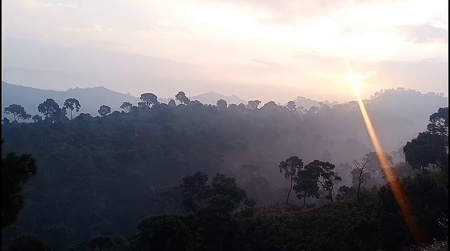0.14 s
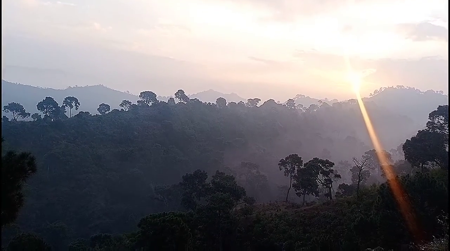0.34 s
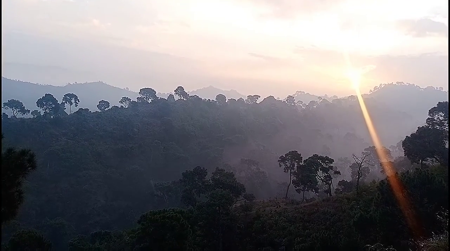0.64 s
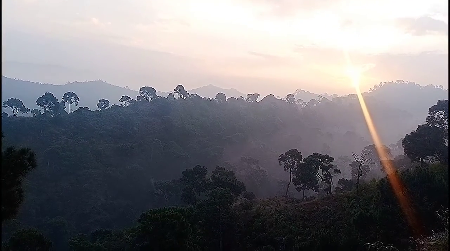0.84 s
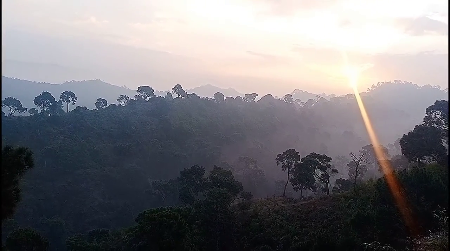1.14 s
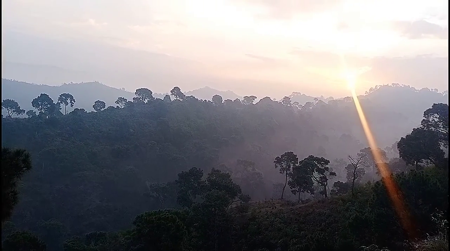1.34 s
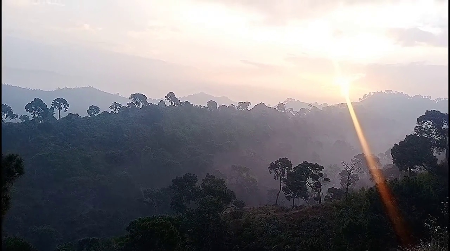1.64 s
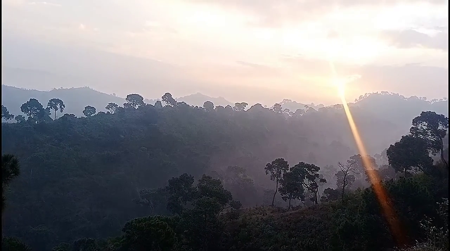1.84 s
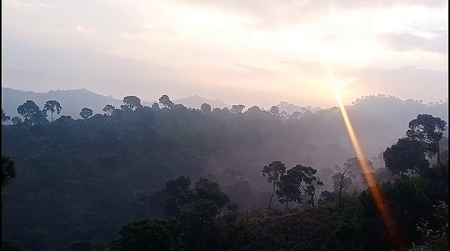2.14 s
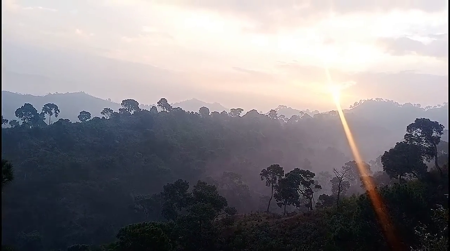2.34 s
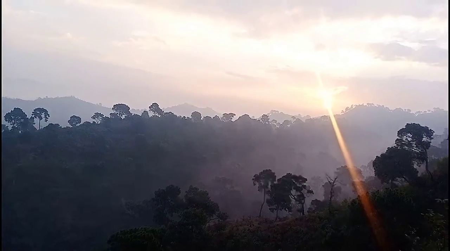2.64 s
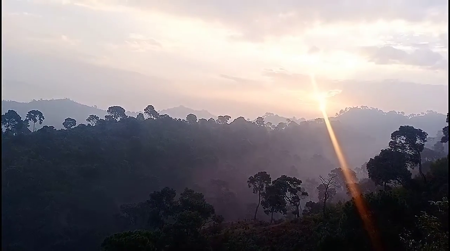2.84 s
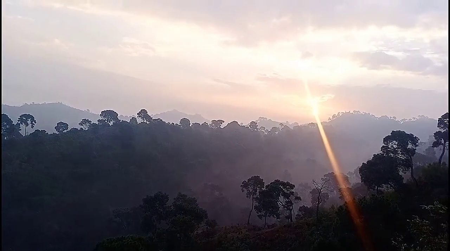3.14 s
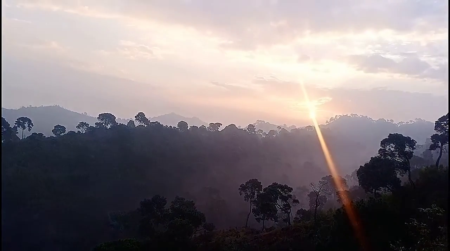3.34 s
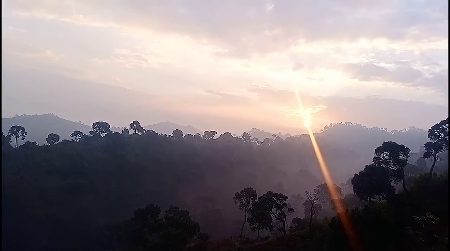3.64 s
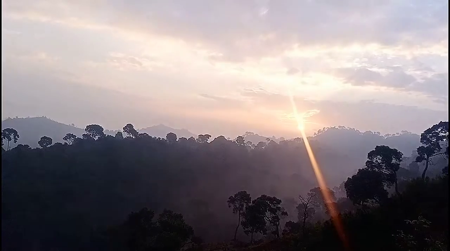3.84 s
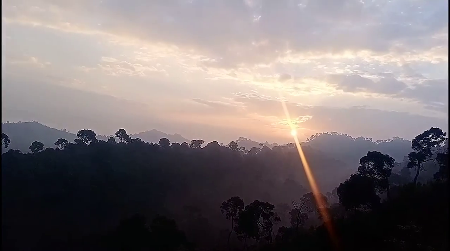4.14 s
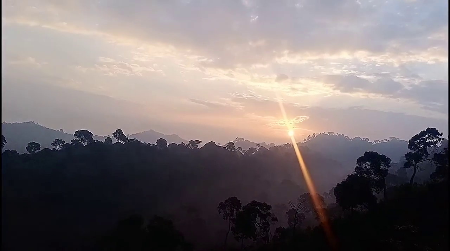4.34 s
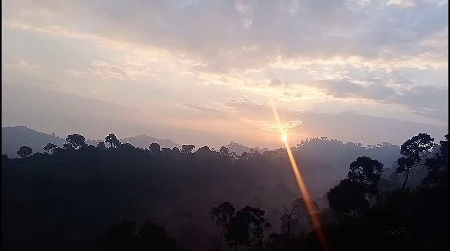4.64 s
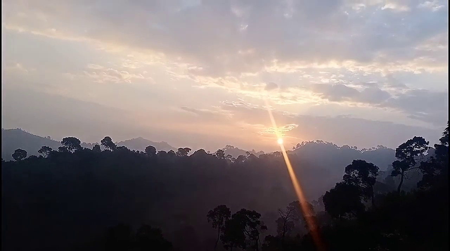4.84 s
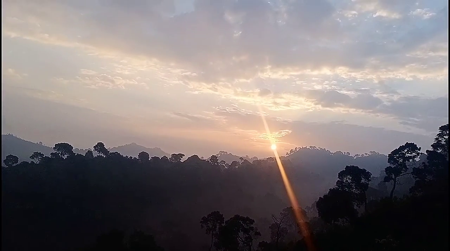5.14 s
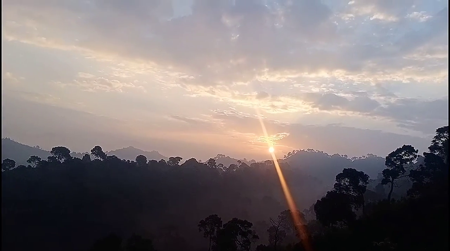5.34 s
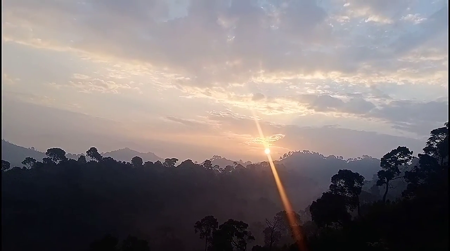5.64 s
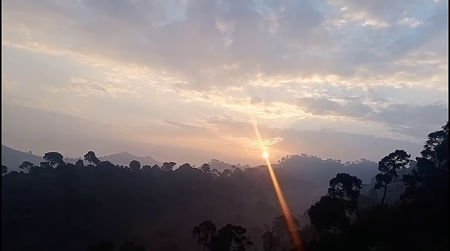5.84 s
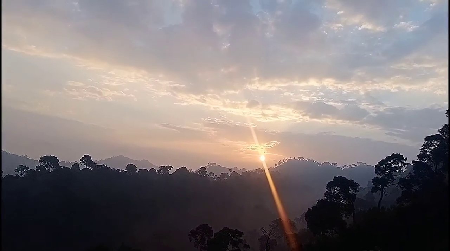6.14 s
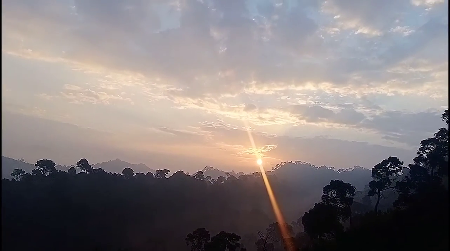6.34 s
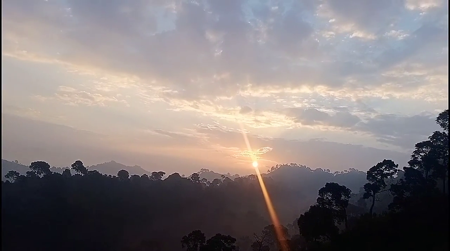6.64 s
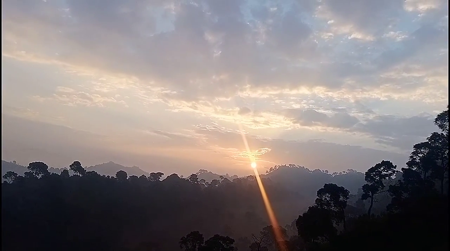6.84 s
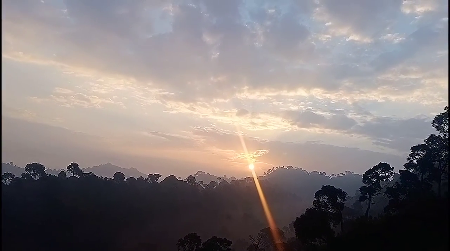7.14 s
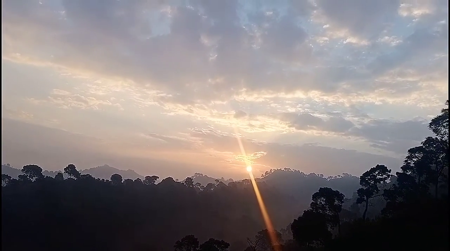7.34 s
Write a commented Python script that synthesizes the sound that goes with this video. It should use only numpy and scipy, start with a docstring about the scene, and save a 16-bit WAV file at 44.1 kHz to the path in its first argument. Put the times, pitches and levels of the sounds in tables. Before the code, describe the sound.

Dawn forest birds: two cracking, squealing cries about four seconds apart over quick chips, soft whistles and a faint distant rooster-like crow.

```python
"""A wooded hillside at dawn. A near bird gives two loud, cracking squeals, built from harmonics that slide
through throat resonances and roughen into noise. Small birds chip and whistle as short gliding tones; what
may be a rooster crows far down the valley with a growling two-harmonic voice. A dry rustle of grainy noise
fades over the first seconds, and noise-shaped echoes scatter every call over faint still air."""
import sys
import numpy as np
from scipy import signal
from scipy.fft import rfft, irfft, next_fast_len
from scipy.io import wavfile
from scipy.ndimage import uniform_filter1d, map_coordinates

SR = 44100
rng = np.random.default_rng(int(sys.argv[2]) if len(sys.argv) > 2 else 0)


def log_audio(samples):
    """Write samples as a 16-bit WAV file to the path given in sys.argv[1]."""
    # one column per channel
    frames = np.atleast_2d(samples).T
    # limit to full scale, then quantise
    limited = np.clip(frames, -1, 1)
    pcm = np.round(limited * 32767).astype(np.int16)
    wavfile.write(sys.argv[1], SR, pcm)


N = 329868


def amp(db):
    """Decibels to gain."""
    return 10 ** (np.asarray(db) / 20)


def unit(x):
    """Scale to rms 1."""
    return x / np.sqrt(np.mean(x ** 2) + 1e-20)


def along(points, hz):
    """Read a curve of (frequency [Hz], value) points on a log frequency axis."""
    f, v = np.transpose(points)
    return np.interp(np.log(np.abs(hz) + 1), np.log(f + 1), v)


def curves(rows):
    """Start time, then one value per sample for each column over the rows' span."""
    s, *cols = np.transpose(rows)
    s = np.maximum.accumulate(s)
    return [s[0]] + [np.interp(np.arange(s[0], s[-1], 1 / SR), s, c) for c in cols]


def level(rows):
    """Gain per sample from (time [s], level [dB]) rows."""
    return amp(np.interp(np.arange(N) / SR, *np.transpose(rows)))


def wobble(rate, size):
    """A smooth random curve through `rate` knots a second."""
    knots = rng.standard_normal(int(size * rate / SR) + 4)
    return map_coordinates(knots, [np.arange(size) * rate / SR])


def add(track, s, x):
    """Mix x into the track from time s."""
    part = track[max(0, round(s * SR)):][:len(x)]
    part += x[:len(part)]


def filtered(x, response):
    """Shape the spectrum of x with a gain that is a function of frequency."""
    m = next_fast_len(N + SR // 2)
    return irfft(rfft(x, m) * response(np.fft.rfftfreq(m, 1 / SR)), m)[:N]


def rush(spectrum, patchy_db):
    """Coloured noise of rms 1 whose gain varies in random patches of time and frequency."""
    z = signal.stft(rng.standard_normal(N), nperseg=512)[2]
    field = uniform_filter1d(rng.standard_normal(z.shape), 4, 0)
    field = uniform_filter1d(field, 10, 1)
    x = signal.istft(z * amp(patchy_db * unit(field)), nperseg=512)[1][:N]
    return unit(filtered(x, lambda hz: amp(along(spectrum, hz))))


def scattered(x, share, t60):
    """Nearby trunks and foliage turn a share of the call's power into a short smear."""
    t = np.arange(SR // 3) / SR
    path = rng.standard_normal(len(t)) * amp(-60 * t / t60)
    share = np.clip(share, 0, 1)
    path *= np.sqrt(share) / np.linalg.norm(path)
    path[0] += np.sqrt(1 - share)  # the direct sound
    return signal.fftconvolve(x, path)


def notes(table, shape, overtones, waver, share, smear_t60, rise=.2):
    """Each note glides through (start, end) over middle pitch; its partials tremble, the higher ones more."""
    far_share_per_db = .025  # a fainter note comes from farther off, so more of it is scattered
    out = np.zeros(N)
    loudest_db = max(row[3] for row in table)
    for s, length, middle_hz, db in table:
        u = np.linspace(0, 1, int(max(length, .005) * SR))  # progress through the note
        n = len(u)
        glide = np.polyfit([0, .5, 1], [shape[0], 1, shape[1]], 2)
        hz = middle_hz * np.polyval(glide, u)
        phase = 2 * np.pi * np.cumsum(hz * (1 + waver * wobble(300, size=n))) / SR
        partials = [amp(g + 2 * k * wobble(67.3, size=n)) * np.sin(k * phase)
                    for k, g in enumerate(overtones, 1)]
        tone = unit(sum(partials))
        swell = np.interp(u, [0, np.clip(rise, .05, .6), .65, 1], [0, 1, .85, 0])
        farther = far_share_per_db * (loudest_db - db)
        add(out, s, scattered(amp(db) * swell * tone, share + farther, smear_t60))
    return out


def air():
    """The still valley's low murmur under a thin, flickering top hiss: two bands of patchy noise."""
    # the murmur's colour: (frequency [Hz], relative level [dB per Hz])
    air_colour = [(20, -37), (50, -9.5), (130, 0), (230, 2.5), (420, -7), (750, -4.5), (900, -7),
                  (1450, -1.5), (1800, -15), (2700, -5), (4000, -6), (6000, -22), (9000, -34.5),
                  (15000, -31)]
    # the hiss before its flicker: (time [s], level [dB])
    hiss_level = [(0, -77.5), (.33, -77), (.42, -83.5), (1, -87.5), (1.35, -84.5), (1.7, -91.5),
                  (7.48, -88)]
    # the hiss's colour: (frequency [Hz], relative level [dB per Hz])
    hiss_colour = [(7000, -35), (9000, -19), (11400, -12.5), (12100, 4), (15400, -2.5)]
    flicker = amp(2.6 * wobble(30, size=N))
    hiss = level(hiss_level) * rush(hiss_colour, patchy_db=3) * flicker
    return amp(-75.0) * rush(air_colour, patchy_db=3) + hiss


def rustle():
    """A dry rustle: noise broken into grains, coming in swells and dying away to a faint remainder."""
    # its swells: (start [s], length [s], peak level [dB])
    rustle_swells = [(0.159, 0.27, -52.5), (.6, 0.15, -56.5), (0.846, 1.18, -60.5)]
    # the leaves' colour: (frequency [Hz], relative level [dB per Hz])
    leaf_colour = [(300, -49.5), (700, -15.5), (1100, -14), (1450, 1.5), (2200, 5), (2800, 0), (3600, -1.5),
                   (4500, 0.5), (5200, -23), (6600, -13.5), (7600, -29), (10000, -47), (15000, -53)]
    start_db, fade_db_per_s, rest_db = -59.5, 6, -85
    t = np.arange(N) / SR
    swell_power = sum(amp(db) ** 2 * np.sin(np.pi * np.clip((t - s) / length, 0, 1)) ** 2
                      for s, length, db in rustle_swells)
    # fade, remainder and swells add as powers
    strength = np.sqrt(amp(start_db - fade_db_per_s * t) ** 2 + amp(rest_db) ** 2 + swell_power)
    grains = amp(0.96 * wobble(120, size=N))
    return strength * unit(rush(leaf_colour, patchy_db=4.5) * grains)


def bumps():
    """Soft dull knocks, each a puff of low noise with a rounded onset and an exponential decay."""
    # (start [s], level before onset and decay [dB], t60 [s])
    bump_rows = [(.01, -69.5, 0.35), (.27, -73, 0.57), (6.694, -62, 0.26), (7.309, -74, 0.15)]
    # a knock's colour: (frequency [Hz], relative level [dB per Hz])
    knock_colour = [(40, -22), (150, -13), (270, -13), (390, 2), (520, -8), (750, -4), (1150, 0),
                    (1700, -10), (4000, -35), (10000, -60)]
    out, t = np.zeros(N), np.arange(SR // 3) / SR
    for s, db, t60 in bump_rows:
        envelope = amp(db - 60 * t / t60) * (1 - np.exp(-t / 0.0074))
        add(out, s, envelope * rush(knock_colour, patchy_db=2.5)[:len(t)])
    return out


def shimmer():
    """Blurred noise in narrow bands: far calls, and the second squeal's echo swelling near 5.5 s."""
    # bands that ring in the shimmer: (centre [Hz], width [Hz], gain [dB])
    shimmer_bands = [(1068, 23, 3), (1451, 200, 3), (2717, 490, 2.5), (4258, 200, 0.5), (5430, 140, -6.5),
                     (6450, 220, -7.5), (7790, 330, -19)]
    # (time [s], level [dB])
    shimmer_level = [(0, -63), (1.9, -67.5), (3, -70), (4, -83), (5.1, -71.5), (5.5, -65.5), (6.3, -79.5),
                     (7.48, -78)]

    def bands(hz):
        return sum(amp(db) / (1 + (2 * (hz - centre) / width) ** 2) for centre, width, db in shimmer_bands)

    white = rush([(1000, 0)], patchy_db=7.5)
    return level(shimmer_level) * unit(filtered(white, bands))


def hoarse_calls():
    """Blurred calls from far off: falling tones with a strong pitch waver, almost wholly scattered."""
    # (start [s], length [s], middle pitch [Hz], level [dB])
    hoarse_rows = [(.17, 0.14, 1956, -61), (.62, 0.13, 2100, -59), (.76, 0.19, 2067, -60),
                   (.9, 0.2, 2070, -60.5), (1.85, .17, 2035, -56), (2.16, 0.17, 2080, -60),
                   (3.885, 0.074, 1926, -59.5)]
    return notes(hoarse_rows, (1.1, 0.97), [0, -11, -24], waver=.1, share=.9, smear_t60=.18)


def hoots():
    """Soft low hoots: single partials in a slight pitch arch."""
    # (start [s], length [s], middle pitch [Hz], level [dB])
    hoot_rows = [(.89, .11, 605, -74.5), (1.01, 0.086, 1515, -56), (1.62, 0.036, 590.3, -54),
                 (1.67, 0.089, 665, -66.5), (2.64, 0.11, 1080, -69), (2.79, 0.038, 1480, -70),
                 (4.02, 0.14, 980, -67), (5.5, .11, 535, -75), (5.51, 0.055, 1170, -63.5),
                 (5.52, 0.048, 968, -56)]
    return notes(hoot_rows, (0.96, 0.92), [0], waver=0.016, share=0.49, smear_t60=0.13)


def rooster():
    """Short opening notes, then long growling syllables, hoarse where high, fading in and out with distance."""
    # the short first notes: (start [s], length [s], pitch [Hz], level [dB])
    opening = [(2.48, 0.069, 617, -62.5), (2.6, .055, 641, -67.5)]
    # the drawn-out syllables, each a list of (time [s], pitch [Hz], level [dB])
    syllables = [
        [(2.86, 729, -68.5), (2.97, 735, -60.5), (3.06, 810, -59.5), (3.27, 825, -59), (3.38, 726, -61.5),
         (3.5, 688, -66), (3.6, 603, -60.5)],
        [(3.64, 647, -60.5), (3.73, 701, -68)],
        [(3.76, 694, -65), (3.9, 685.7, -61.5), (4.08, 658, -68), (4.22, 674, -68), (4.3, 618, -62),
         (4.5, 615.4, -63), (4.6, 529, -76.5)],
    ]
    # roughness (0-1) and its rise as the pitch climbs through the strain range
    base_rough, strain_hz, strain_rough = .36, (690, 810), .5
    octave_db, strain_octave_db = -2.5, -10.5  # second harmonic, and its change when strained
    edge_s = 0.011  # each syllable's rise and fall
    growl_hz, growl_depth = 76.1, 0.68  # slow second vibration in the throat; depth scales with roughness
    out = notes(opening, (.96, 1.03), [0, -12], waver=.015, share=0.47, smear_t60=0.16)
    for syllable in syllables:
        s, hz, db = curves(syllable)
        n = len(hz)
        t = np.arange(n) / SR
        strain = np.interp(hz, strain_hz, [0, 1])
        rough = base_rough + strain_rough * strain
        second = amp(octave_db + strain_octave_db * strain)
        jitter = .075 * rough * wobble(190, size=n)
        phase = 2 * np.pi * np.cumsum(hz * (1 + jitter)) / SR
        # each harmonic fades in and out on its own
        first_fading, second_fading = amp(3.5 * wobble(24, size=n)), amp(3.5 * wobble(24, size=n))
        tone = first_fading * np.sin(phase) + second * second_fading * np.sin(2 * phase)
        tone /= np.hypot(1, second)
        tone *= 1 + growl_depth * rough * np.sin(2 * np.pi * growl_hz * t + wobble(20.7, size=n))
        swell = np.minimum(np.minimum(t, t[::-1]) / edge_s, 1)
        add(out, s, scattered(amp(db) * swell * unit(tone), share=.35, t60=.1))
    return out


def whistler(ring_hz=4480, width_hz=480, ring_db=7):
    """A distant bird's arched whistles; the octave stands out when it meets a resonance of the throat."""
    # (start [s], length [s], middle pitch [Hz], level before the resonance [dB])
    whistle_rows = [(.42, 0.2, 2390, -61.5), (.66, 0.19, 2296, -63.5), (.85, 0.18, 2193, -60),
                    (1.01, 0.33, 2266, -59.5), (4.35, .1, 2224, -69), (4.53, 0.28, 2350, -67.5),
                    (4.78, 0.089, 2110, -69), (4.95, 0.15, 2202, -63), (6.02, .19, 2370, -66),
                    (6.5, 0.24, 2321, -64), (6.83, .2, 2260, -66.5)]
    voice = notes(whistle_rows, (0.98, 0.94), [0, -7, -23], waver=.014, share=.5, smear_t60=.16)
    return filtered(voice, lambda hz: 1 + amp(ring_db) / (1 + (2 * (hz - ring_hz) / width_hz) ** 2))


def faint_chips(count, level_db, centre_hz, spread_db=10):
    """A table of tiny notes from birds deep in the trees, loosely spaced in time."""
    when, length, pitch, loud = rng.random((count, 4)).T
    start = (np.arange(count) + when) / count * N / SR
    middle_hz = centre_hz * 2 ** (pitch - .5)
    return np.transpose([start, 0.029 + .016 * length, middle_hz, level_db + spread_db * (loud - .5)])


def small_birds():
    """Gliding single-partial notes of five kinds close by, with fainter random twitter behind them."""
    # all five: (start [s], length [s], middle pitch [Hz], level [dB])
    chip_rows = [(2.534, 0.03, 3680, -51.5), (3.28, 0.033, 4160, -71.5), (3.51, 0.054, 3580, -69),
                 (4.094, .024, 3425, -44), (4.472, 0.018, 3370, -44.5), (5.96, 0.028, 4060, -65.5),
                 (6.2, 0.022, 3820, -68), (7.25, 0.054, 4030, -73.5)]  # sharp downward chips
    slur_rows = [(.215, 0.044, 2680, -50.5), (.77, 0.068, 5670, -60), (2.442, 0.017, 4370, -50.5),
                 (2.682, 0.042, 3300, -51), (2.708, 0.022, 3014, -52), (2.735, 0.073, 3162, -50),
                 (2.912, 0.058, 2970, -50.5), (2.96, .06, 2417, -58), (3.165, 0.048, 4430, -57.5),
                 (3.655, 0.018, 3990, -61), (4.255, .035, 2250, -57), (4.29, .04, 1985, -61.5),
                 (4.42, 0.031, 1996, -55.5), (4.475, .045, 2208, -51), (4.48, .03, 4370, -53.5),
                 (4.735, 0.084, 5670, -63), (4.89, 0.059, 3100, -60.5), (4.935, 0.029, 2476, -58),
                 (5.733, .04, 2535, -55.5), (6.625, .036, 4450, -58.5)]  # gently falling slurs
    chirp_rows = [(.035, .085, 3124, -50), (2.13, 0.063, 4300, -63), (3.335, .02, 3750, -68.5),
                  (3.612, 0.015, 3500, -68), (4.05, .055, 3207, -51), (4.115, 0.052, 2515, -49),
                  (5.685, 0.043, 4450, -68.5), (5.833, 0.033, 3130, -60), (6.075, 0.025, 3230, -59),
                  (6.968, .04, 3600, -63), (6.99, 0.031, 5500, -68.5), (7.184, .018, 3530, -60.5)]  # rising chirps
    peep_rows = [(4.37, .056, 2930, -47), (6.245, .062, 2666, -61.5)]  # short arched notes
    thin_rows = [(.88, 0.11, 6000, -67), (2.39, .04, 4630, -62.5), (4.41, 0.079, 4740, -64),
                 (4.5, 0.24, 5360, -76), (5.93, 0.045, 4780, -71), (6.57, .06, 4690, -63)]  # thin, gently rising high notes
    close = (notes(chip_rows, (1.42, .75), [0], waver=0.024, share=0.29, smear_t60=0.2, rise=.3)
             + notes(slur_rows, (1.08, 0.95), [0], waver=.02, share=0.46, smear_t60=0.19, rise=0.25)
             + notes(chirp_rows, (.85, 1.06), [0], waver=.033, share=.65, smear_t60=0.18, rise=.4)
             + notes(peep_rows, (.9, 0.72), [0], waver=.015, share=0.28, smear_t60=0.13, rise=0.28)
             + notes(thin_rows, (1, 1.03), [0], waver=0.016, share=0.88, smear_t60=0.21, rise=0.48))
    falling = notes(faint_chips(count=56, level_db=-73, centre_hz=3900), (1.15, .88), [0],
                    waver=.04, share=.75, smear_t60=.22)
    rising = notes(faint_chips(count=36, level_db=-76, centre_hz=3620), (.86, 1.1), [0],
                   waver=.04, share=.72, smear_t60=.22)
    return close + falling + rising


def squeals(flutter=.6, rasp_db=-3, uneven_db=3):
    """A strained voice that jumps register; its harmonics slide through the throat's resonances."""
    # per squeal: (starting level [dB], fading [dB/s], attack [s], overtone slope [dB/octave],
    # extra slope of the low opening [dB/octave per octave below the easy pitch],
    # steady roughness [0-1], extra roughness at a crack [0-1])
    squeal_rows = [(-34, 4, 0.043, -2, 14, 0.07, 0.01), (-37, 21, 0.027, -3.5, 2, .13, 0.58)]
    # each squeal climbs, then sinks and drops away: (time [s], pitch outside the cracks [Hz])
    squeal_pitch = [
        [(1.215, 1083), (1.26, 1220), (1.293, 1978), (1.368, 2024), (1.39, 1614), (1.414, 1854), (1.44, 1390),
         (1.472, 1511), (1.494, 1351), (1.54, 1401), (1.594, 1309), (1.62, 829)],
        [(5.145, 860), (5.177, 987), (5.22, 1060), (5.235, 1504), (5.275, 1545), (5.29, 1360), (5.325, 1483),
         (5.378, 1522), (5.4, 1369), (5.47, 1258), (5.51, 801)],
    ]
    # the voice flips into its upper register: (start [s], length [s])
    cracks = [(1.296, 0.029), (1.338, 0.041), (5.261, 0.012), (5.299, 0.02)]
    # the throat's shape in each squeal: (frequency [Hz], gain [dB])
    throats = [
        [(500, -17), (1000, -28), (1400, -13), (2000, -11), (2750, 6.5), (3500, -2), (4200, -6.5),
         (5400, -12.5), (6100, -22), (6700, -20), (7400, -41), (11000, -71.5), (15000, -51)],
        [(500, -19.5), (1000, -10.5), (1380, -12.5), (2050, -4.5), (2700, 7), (3050, 3.5), (3650, -13.5),
         (4550, -7), (5200, -3.5), (6050, -17.5), (7000, -17), (8000, -44), (13000, -63.5)],
    ]
    # turbulent air: (frequency [Hz], relative level [dB per Hz])
    rasp_colour = [(500, -44), (1000, -30), (1700, -11.5), (2300, 2.5), (3000, 7.5), (3700, -1.5),
                   (4500, -7), (5400, 2), (6800, -16), (7600, -44), (10000, -54), (15000, -52)]
    # scattered share of each squeal's power [0-1]
    squeal_scatter = [0.2, 0.34]
    # pitch ratio of the flip, its duration, the rough spell around it
    crack_ratio, flip_s, unsettled_s = 1.35, 0.0058, .07
    # the slide speed scale; fast slides roughen and weaken the voice
    slide_oct_per_s, slide_rough, slide_loss_db = 22, 0.31, 5.5
    # above its easy pitch the voice gets louder, below it thinner and brighter
    easy_hz, effort_db_per_oct = 1350, 4
    release_s = 0.022

    out = np.zeros(N)
    k = np.arange(1, 9)[:, None]  # harmonic numbers
    for pitch, row, throat, share in zip(squeal_pitch, squeal_rows, throats, squeal_scatter):
        start_db, fade, attack, slope_db, thin_db, steady, cracking = row
        s, hz = curves(pitch)
        n = len(hz)
        t = np.arange(n) / SR
        upper = sum(1. * ((s + t > at) & (s + t < at + length)) for at, length in cracks)
        hz = hz * crack_ratio ** uniform_filter1d(upper, int(flip_s * SR))
        slide = np.tanh(np.abs(np.gradient(np.log2(hz))) * SR / slide_oct_per_s)
        slide = uniform_filter1d(slide, int(flip_s * SR))
        unsettled = np.minimum(2 * uniform_filter1d(upper, int(unsettled_s * SR)), 1)
        rough = np.clip(steady + slide_rough * slide + cracking * unsettled, 0, 1)

        swell = np.minimum(t / attack, 1) ** 2 * np.minimum(t[::-1] / release_s, 1)
        effort = np.log2(hz / easy_hz)  # octaves from the easy pitch
        db = start_db - fade * t + effort_db_per_oct * np.maximum(effort, 0)
        db -= slide_loss_db * (slide + cracking * unsettled)
        tilt_db = slope_db - thin_db * np.minimum(effort, 0) * (1 - t / t[-1])

        jitter = .045 * rough * wobble(500, size=n)
        phase = 2 * np.pi * np.cumsum(hz * (1 + jitter)) / SR
        # as the voice breaks, the upper harmonics lose step first and dissolve into noise
        blur = .45 * k * rough * np.array([wobble(650, size=n) for _ in k])
        uneven = uneven_db * np.array([wobble(70, size=n) for _ in k])
        weights = amp(along(throat, k * hz) + tilt_db * np.log2(k) + uneven) * (k * hz < SR / 2)
        voice = (weights * np.sin(k * phase + blur)).sum(0)
        voice /= np.sqrt((weights ** 2).sum(0) / 2)  # even out the power
        # an unsteady syrinx shakes in strength and lets turbulent air through
        voice *= 1 + flutter * rough * wobble(450, size=n)
        rasp = amp(rasp_db) * rough * rush(rasp_colour, patchy_db=2.5)[:n]
        add(out, s, scattered(amp(db) * swell * (voice + rasp), share, t60=.11))
    return out


def forest(x):
    """The hillside's long answer: a noise tail in which each frequency dies at its own speed."""
    # (frequency [Hz], t60 [s])
    forest_t60 = [(300, 1.2), (1500, 0.56), (2800, 1.42), (5500, 0.55), (10000, 0.65)]
    hz, t, z = signal.stft(rng.standard_normal(3 * SR // 2), SR, nperseg=256)
    decay = amp(-60 * t / along(forest_t60, hz)[:, None])
    build_up = 1 - np.exp(-t / 0.014)
    tail = signal.istft(z * decay * build_up, SR, nperseg=256)[1]
    return signal.fftconvolve(x, tail / np.linalg.norm(tail))[:N]


def scene():
    """Near and far birds, each with its share of the forest's echo, over the background."""
    near, small, whistles, hoarse = squeals(), small_birds(), whistler(), hoarse_calls()
    low = rooster() + hoots()
    echo = forest(amp(-15.5) * near + amp(-18.0) * small + amp(-7.0) * (whistles + hoarse) + amp(-15) * low)
    birds = near + small + whistles + hoarse + low
    return (birds + echo + shimmer() + rustle() + bumps() + air())[None]


def record(dry):
    """A sharp band limit: nothing passes from 15500 Hz upward."""
    return filtered(dry[0], lambda hz: hz < 15500)[None]


dry = scene()
out = record(dry)
log_audio(out)
```